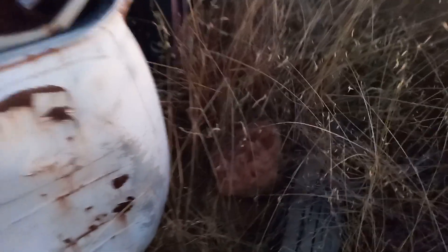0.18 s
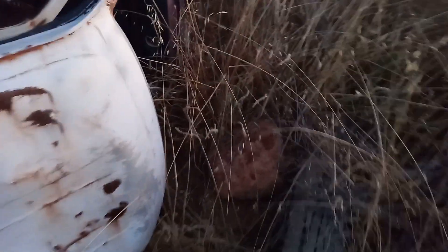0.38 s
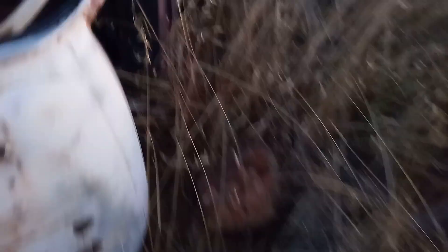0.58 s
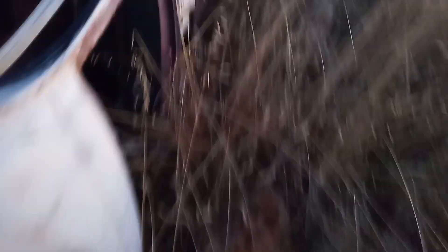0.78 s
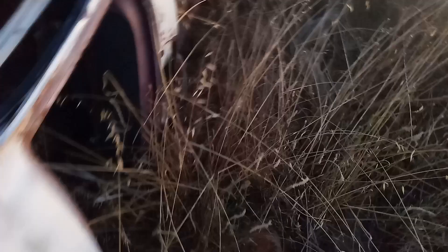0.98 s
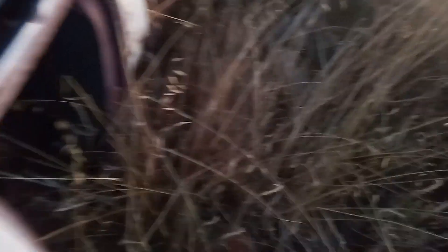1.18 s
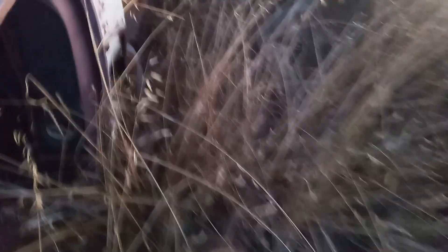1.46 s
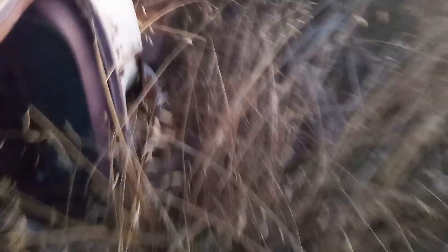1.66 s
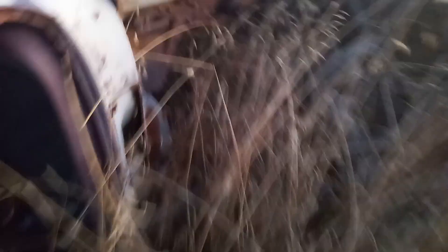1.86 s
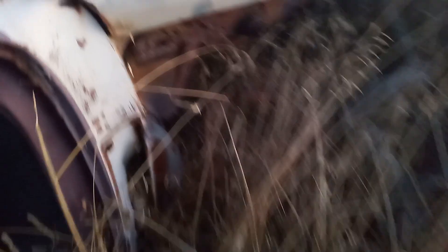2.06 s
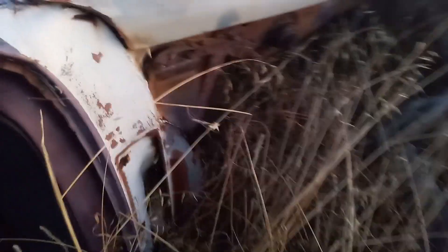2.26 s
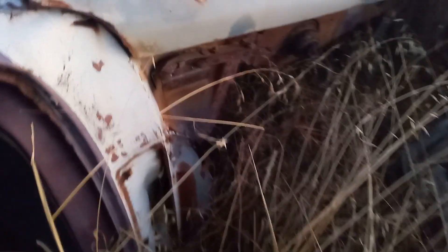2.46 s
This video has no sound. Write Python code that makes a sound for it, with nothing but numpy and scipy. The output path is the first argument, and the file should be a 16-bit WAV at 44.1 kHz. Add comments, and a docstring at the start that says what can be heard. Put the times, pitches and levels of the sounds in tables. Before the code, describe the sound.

Dry grass crackles close up, outdoors and without echo. A faint rustle with tiny ticks opens; a dull, woody crunch lands at 0.22 seconds, then the loudest, sharp brittle crackle at 0.45 with a short creak. It quiets to faint brushing, with light flicks around 1.0. A small crackle with a soft thud comes at 1.6, brighter swishes and flicks at 2.05 and 2.25, then a thin fading hiss.

```python
"""A faint dry rustle opens, then two crunches underfoot: someone pushes slowly through tall dry grass.
The second crunch is a sharp crackle of breaking stalks, a lighter one comes later, and dull thuds sit under all three.
Snaps, flicks, knocks and thuds are short coloured noise bursts; creaks are rough tones with a rising pitch.
Brushing, scraping and rubbing are clumped ticks over noise; a high seed-head hiss grows toward the end.
A low rumble swells underneath, and the highest treble dulls late on."""
import sys
import numpy as np
from scipy import signal
from scipy.fft import rfft, irfft
from scipy.io import wavfile
from scipy.ndimage import uniform_filter1d

SR = 44100
rng = np.random.default_rng(int(sys.argv[2]) if len(sys.argv) > 2 else 0)


def log_audio(samples):
    """Write samples as a 16-bit WAV file to the path given in sys.argv[1]."""
    # one column per channel
    frames = np.atleast_2d(samples).T
    # limit to full scale, then quantise
    limited = np.clip(frames, -1, 1)
    pcm = np.round(limited * 32767).astype(np.int16)
    wavfile.write(sys.argv[1], SR, pcm)


N = 114660
T = np.arange(N) / SR

# low rumble of the walker's movement: (time [s], level [dB])
RUMBLE_LEVEL = [(0, -87), (.25, -78.5), (.6, -72), (.72, -83.5), (1.15, -82.5), (1.3, -75.5), (1.52, -84),
                (1.57, -68.5), (1.7, -79), (1.775, -69.5), (1.815, -59), (1.85, -82.5), (2.6, -82.5)]
# its colour: (frequency [Hz], gain [dB])
RUMBLE_COLOUR = [(20, -42), (45, -27), (80, 7), (130, 0.5), (220, 0), (500, -33), (2000, -44.5)]

# dull rubbing of the flattened grass: (time [s], level [dB])
RUB_LEVEL = [(0, -82), (.68, -86.5), (.83, -67.5), (1.04, -92), (1.26, -73), (1.39, -87), (1.62, -64),
             (1.7, -85), (1.76, -79), (1.85, -66.5), (1.9, -81.5), (2.6, -86)]
# its colour: (frequency [Hz], gain [dB])
RUB_COLOUR = [(60, -33.5), (170, -11.5), (320, -5.5), (680, -9), (850, -12.5), (2000, -32.5), (8000, -62)]
RUB_TICKS_PER_S, RUB_SPREAD_DB, RUB_HISS = 330, 3.5, 0.65

# thicker stems scraping and bending low down: (time [s], level [dB])
SCRAPE_LEVEL = [(0, -59.5), (.04, -60.5), (.16, -70.5), (.21, -67), (.245, -40), (.28, -65), (.44, -66),
                (.475, -41), (.5, -53), (.54, -70), (.68, -78.5), (.81, -67), (.92, -78.5), (1.04, -61.5),
                (1.19, -76.5), (1.26, -65.5), (1.37, -70), (1.52, -67.5), (1.61, -53.5), (1.68, -80),
                (1.755, -57.5), (1.8, -74), (1.85, -62), (1.885, -77), (1.92, -84), (2.08, -61),
                (2.19, -73.5), (2.6, -87)]
# colour of thick stems, scraped or knocked: (frequency [Hz], gain [dB])
STEM_COLOUR = [(60, -22.5), (180, -15), (310, -2.5), (620, -8), (800, -2), (1200, -1), (2600, 1),
               (4200, -4.5), (8000, -12), (16000, -34)]
SCRAPE_TICKS_PER_S, SCRAPE_SPREAD_DB, SCRAPE_HISS = 900, 3, 0.57

# brushing of the fine blades and seed heads: (time [s], level [dB])
BRUSH_LEVEL = [(0, -59), (.05, -49.5), (.08, -57.5), (.16, -51.5), (.2, -62), (.27, -58.5), (.32, -60.5),
               (.36, -59), (.52, -63), (.68, -68.5), (.83, -65), (.941, -74.5), (.949, -55.5),
               (1.12, -52.5), (1.215, -62.5), (1.36, -62.5), (1.43, -55), (1.52, -62), (1.6, -60.5),
               (1.86, -57.5), (1.91, -52.5), (1.98, -51), (2.075, -45.5), (2.16, -57.5), (2.232, -57.5),
               (2.255, -45.5), (2.31, -59), (2.42, -71.5), (2.6, -75)]
# its colour: (frequency [Hz], gain [dB])
BLADE_COLOUR = [(200, -21.5), (900, -30), (2000, -11.5), (3500, -6.5), (5000, -2.5), (6600, 1), (9200, -1),
                (10200, -12.5), (12000, -18.5), (13800, -25), (15000, -1.5), (16000, -12.5)]
BRUSH_TICKS_PER_S, BRUSH_SPREAD_DB, BRUSH_HISS = 3000, 2.5, 0.52

# thin hiss of seed heads sliding past at the end: (time [s], level [dB])
SEED_LEVEL = [(1.7, -100), (2.1, -60), (2.41, -66), (2.5, -61.5), (2.6, -71.5)]
# its colour: (frequency [Hz], gain [dB])
SEED_COLOUR = [(3500, -28), (5600, -13.5), (7100, -4), (10000, -36)]

# clumping and patchy colour shared by the rustling layers; depths are rms
CLUMP_S, CLUMP_DB = 0.013, 2.5
PATCH_HZ, PATCH_S, PATCH_DB = 260, .03, 3

# bending stems: (time [s], rms level before the swell [dB], length [s], mid-creak pitch [Hz])
CREAKS = [(.447, -39.5, 0.044, 2700), (.443, -40, 0.045, 3620), (1.214, -72.5, 0.089, 329.7),
          (1.268, -64.5, 0.029, 4200), (1.332, -71, 0.034, 472), (1.478, -68, 0.042, 348)]
CREAK_RISE_HZ_PER_S, CREAK_JITTER_SHARE = 850, 0.053
CREAK_SLIP_S, CREAK_ROUGH_DB = 0.0017, 4

# thicker stems knocking low down: (time [s], onset level [dB])
KNOCKS = [(0.786, -69), (1.038, -58), (1.438, -56), (1.631, -52.5), (1.741, -57), (1.761, -54.5),
          (1.848, -59), (2.341, -55)]
KNOCK_DECAY_S, KNOCK_DB_PER_OCTAVE = 0.0045, -3

# seed heads and stalks flicking past: (time [s], onset level [dB])
FLICKS = [(0.107, -46.5), (.342, -50), (0.832, -51.5), (0.868, -53), (.987, -45), (1.008, -47.5),
          (1.04, -47.5), (1.089, -49), (1.127, -51), (1.339, -50), (1.777, -55), (1.903, -54), (1.942, -51),
          (1.994, -55), (2.039, -44.5), (2.058, -38.5), (2.122, -47.5), (2.243, -46), (2.332, -50.5)]
# their colour: (frequency [Hz], gain [dB])
FLICK_COLOUR = [(200, -60), (900, -14.5), (2000, -2.5), (3500, 6.5), (6700, 4.5), (9000, 3), (12000, -14),
                (15500, -11)]
FLICK_DECAY_S = 0.0041

# weight on the matted ground: (time [s], level before THUD_GAIN [dB], decay [s], centre [Hz])
THUDS = [(0.191, -59.5, 0.059, 360), (0.2219, -34, 0.0031, 340), (0.245, -49.5, 0.008, 320),
         (.256, -52.5, 0.0075, 480), (0.46, -41, 0.0097, 680), (0.472, -44, 0.01, 234.7),
         (0.513, -55, 0.0071, 262), (.585, -57.5, 0.0033, 207), (1.596, -56, 0.011, 324)]
# resonances of the matted ground: (frequency [Hz], width [Hz], relative peak [dB])
GROUND_RESONANCES = [(247.7, 76, -2), (317.3, 89, 2), (533, 220, -3.5), (650, 99, 1.5)]
THUD_RISE_S, THUD_OCTAVES, THUD_GAIN = 0.0023, 0.98, 2

# stalks breaking: (time [s], level before SNAP_TRIM_DB [dB], centre [Hz], time for fibres to give way [s])
SNAPS = [(0.0243, -43.5, 4970, 0.00062), (0.039, -42, 3900, 0.00041), (.189, -46.5, 1870, 0.0012),
         (0.2143, -47.5, 2840, 0.002), (0.2192, -38.5, 2600, .001), (0.2238, -29, 2120, 0.00092),
         (0.2283, -33, 2300, 0.00044), (0.2385, -36, 2700, .0003), (0.2459, -33, 2200, 0.0007),
         (.2470, -31, 1187, 0.00054), (0.3754, -50.5, 3340, 0.0008), (0.41, -49, 4110, 0.0003),
         (.425, -49, 4530, 0.00037), (0.4332, -37.5, 4730, 0.0002), (.4439, -32.5, 3820, 0.00033),
         (0.4463, -21.5, 3860, 0.00045), (0.4555, -28, 3580, 0.00012), (0.46, -35.5, 8630, 0.00034),
         (0.4617, -27.5, 5930, 0.000082), (0.4656, -35.5, 5500, 0.00042), (0.469, -36.5, 2950, 0.00074),
         (0.472, -36.5, 3300, 0.00025), (0.4782, -39, 2390, .0012), (0.482, -37.5, 3280, 0.00077),
         (0.493, -54.5, 6500, 0.00015), (0.5117, -43.5, 3440, 0.00085), (0.9477, -46, 7200, 0.000065),
         (1.5919, -39, 5340, 0.00011), (1.5944, -41, 2380, 0.00025), (1.5958, -41, 2070, 0.0009),
         (1.610, -54, 4160, 0.00069), (1.6217, -48.5, 3940, 0.00036)]
# base colour of a breaking stalk: (frequency [Hz], gain [dB])
STALK_COLOUR = [(60, -44.5), (250, -11), (600, 4), (820, -11), (1000, -0.5), (1400, -1.5), (3600, -0.5),
                (5200, -3), (6700, -1.5), (9000, -5), (12000, -22.5), (15500, -11.5)]
# ringing of the hollow stalks: (frequency [Hz], width [Hz], lift [dB])
STALK_RINGS = [(1026, 190, 4.5), (1408, 150, 9), (2295, 240, 3.5), (2780, 143, -1), (3660, 294, 2.5),
               (6180, 100, 3), (6640, 490, 5), (9070, 270, 8.5)]
SNAP_TRIM_DB, SNAP_SPAN_S = -1, .005  # level is mean power over the span
SNAP_OCTAVES, SNAP_SKIRT_DB = 0.75, -16
SNAP_RING_DB, SNAP_RING_OCTAVES = 4, 0.16
SNAP_DECAY_S, DECAY_PER_GIVE = .0012, 0.53  # slower breaks also die away slower
SPLINTER_DB, SPLINTER_DECAY_S = -18, 0.0067
SPLINTER_CLUMP_S, SPLINTER_CLUMP_DB = 0.00086, 5

# edge above which the treble is dulled: (time [s], edge [Hz])
TREBLE_EDGE = [(0, 11500), (1.6, 10200), (1.9, 8110), (2.6, 8310)]
# no dulling with the edge at OPEN_HZ, DULL_DB with it at SHUT_HZ
DULL_DB, DULL_WIDTH_HZ, OPEN_HZ, SHUT_HZ = -17.5, 440, 10600, 8170
CUTOFF_HZ = 15800


def amp(db):
    """Decibels to gain."""
    return 10 ** (np.asarray(db) / 20)


def unit(x):
    """Scales to an rms of one."""
    return x / np.sqrt(np.mean(x ** 2) + 1e-20)


def curve(points, t=T):
    """Joins points in time by straight lines."""
    return np.interp(t, *np.transpose(points))


def spectrum(points, hz):
    """Reads a colour in dB on a log-frequency axis."""
    f, db = np.transpose(points)
    return np.interp(np.log(hz + 1), np.log(f), db)


def wander(n, seconds):
    """Smooth random drift of rms one that changes over about this time."""
    width = max(int(seconds * SR), 2)
    smooth = uniform_filter1d(rng.standard_normal(n), width)
    return unit(uniform_filter1d(smooth, width))


def add(mix, s, sound):
    """Mixes a sound in at a time."""
    part = mix[round(s * SR):][:len(sound)]
    part += sound[:len(part)]


def colour(x, db_at, size=2048):
    """Causal minimum-phase filter of unit energy, shaped by db_at(Hz)."""
    log_gain = np.log(amp(db_at(abs(np.fft.fftfreq(size, 1 / SR)))))
    taps = np.fft.ifft(np.exp(np.conj(signal.hilbert(log_gain)))).real
    return signal.fftconvolve(x, taps / np.linalg.norm(taps))[:len(x)]


def burst(envelope, db_at, count=2):
    """A short shower of fibre fractures: noise driving all pitches evenly, with its envelope's energy."""
    drive = envelope * rng.standard_normal(len(envelope))
    for _ in range(count):
        # flatten the spectrum, then even out the loudness and reapply the envelope
        flat = irfft(np.exp(1j * np.angle(rfft(drive))), len(drive))
        loudness = np.sqrt(abs(uniform_filter1d(flat ** 2, size=48)) + 1e-12)
        drive = envelope * flat / loudness
    x = colour(drive, db_at)
    return x * np.linalg.norm(envelope) / np.linalg.norm(x)


def patchy(x, size=512):
    """Different stalks touch from moment to moment, so the colour shifts in small patches."""
    hz, t, z = signal.stft(x, SR, nperseg=size)
    field = rng.standard_normal(z.shape[::-1]).T
    field = uniform_filter1d(field, max(int(PATCH_HZ / hz[1] + .5), 1), axis=0)
    field = uniform_filter1d(field, max(int(PATCH_S / t[1] + .5), 1), axis=1)
    return unit(signal.istft(z * amp(PATCH_DB * unit(field)), SR, nperseg=size)[1][:N])


def rustle(level, tone, rate, spread_db, hiss):
    """Clumps of tiny stick-slip ticks of uneven size over the blur of many fainter ones."""
    sizes = amp(spread_db * np.minimum(rng.exponential(1, N), 4))
    happens = rng.random(N) < rate / SR
    ticks = sizes * rng.choice([-1., 1.], N) * happens
    blur = hiss * rng.standard_normal(N)
    clumps = amp(CLUMP_DB * wander(N, CLUMP_S))
    drive = patchy((unit(ticks) + blur) * clumps)
    return colour(drive * amp(curve(level)), lambda f: spectrum(tone, f))


def rumble():
    """Soft low noise that swells as the walker shifts weight."""
    noise = rng.standard_normal(N)
    low = colour(noise, lambda f: spectrum(RUMBLE_COLOUR, f), size=8192)
    return unit(low) * amp(curve(RUMBLE_LEVEL))


def rubbing():
    """Flattened grass rubs in sparse, dull stick-slip ticks."""
    return rustle(RUB_LEVEL, RUB_COLOUR, RUB_TICKS_PER_S, RUB_SPREAD_DB, RUB_HISS)


def scraping():
    """Thicker stems scrape and bend in coarse stick-slip ticks."""
    return rustle(SCRAPE_LEVEL, STEM_COLOUR, SCRAPE_TICKS_PER_S, SCRAPE_SPREAD_DB, SCRAPE_HISS)


def brushing():
    """Fine blades and seed heads brush past in dense, bright ticks."""
    return rustle(BRUSH_LEVEL, BLADE_COLOUR, BRUSH_TICKS_PER_S, BRUSH_SPREAD_DB, BRUSH_HISS)


def seed_hiss():
    """Seed heads slide past with the dense ticks of brushing, in a thin high colour."""
    return rustle(SEED_LEVEL, SEED_COLOUR, BRUSH_TICKS_PER_S, BRUSH_SPREAD_DB, BRUSH_HISS)


def creaks():
    """A bending stem sticks and slips in a rough tone that rises as it tightens."""
    out, t = np.zeros(N), T[:SR // 10]
    for s, db, length, hz in CREAKS:
        jitter = 1 + CREAK_JITTER_SHARE * wander(len(t), CREAK_SLIP_S)
        pitch = hz * jitter + CREAK_RISE_HZ_PER_S * (t - length / 2)
        roughness = amp(CREAK_ROUGH_DB * wander(len(t), CREAK_SLIP_S))
        tone = np.sin(2 * np.pi * np.cumsum(pitch) / SR) * roughness
        swell = np.sin(np.pi * np.minimum(t / length, 1))
        add(out, s, amp(db) * swell * unit(tone))
    return out


def knocks():
    """Thicker stems knock together low down, each a darkened, decaying burst."""
    def tone(f):
        return spectrum(STEM_COLOUR, f) + KNOCK_DB_PER_OCTAVE * np.log2(f + 1)

    out, t = np.zeros(N), T[:SR // 20]
    for s, db in KNOCKS:
        add(out, s, amp(db) * burst(np.exp(-t / KNOCK_DECAY_S), tone))
    return out


def flicks():
    """Single stalks slip free and tap their neighbours, each a bright, decaying burst."""
    out, t = np.zeros(N), T[:SR // 20]
    for s, db in FLICKS:
        tap = burst(np.exp(-t / FLICK_DECAY_S), lambda f: spectrum(FLICK_COLOUR, f))
        add(out, s, amp(db) * tap)
    return out


def thuds():
    """The foot's weight shakes the damped low resonances of the grass mat."""
    out, t = np.zeros(N), T[:SR // 6]
    for s, db, decay, centre in THUDS:
        def tone(f):
            mat = sum(amp(peak) ** 2 / (1 + (2 * (f - hz) / width) ** 2) ** 2
                      for hz, width, peak in GROUND_RESONANCES)
            focus = np.exp(-(np.log2((f + 1) / centre) / THUD_OCTAVES) ** 2)
            return 10 * np.log10(mat * focus + 1e-7)

        envelope = (1 - np.exp(-t / THUD_RISE_S)) * np.exp(-t / decay)
        add(out, s, THUD_GAIN * amp(db) * burst(envelope, tone))
    return out


def snaps():
    """Each stalk gives way with a crack, rings briefly at its own pitch and trails off in splinters."""
    out, t = np.zeros(N), T[:SR // 10]
    for s, db, hz, give in SNAPS:
        def tone(f):
            octaves = np.log2((f + 1) / hz)
            bump = np.exp(-.5 * (octaves / SNAP_OCTAVES) ** 2)
            focus = 20 * np.log10(bump + amp(SNAP_SKIRT_DB))
            own_ring = SNAP_RING_DB / (1 + (octaves / SNAP_RING_OCTAVES) ** 2)
            hollow_rings = sum(lift / (1 + (2 * (f - at) / width) ** 2)
                               for at, width, lift in STALK_RINGS)
            return spectrum(STALK_COLOUR, f) + own_ring + hollow_rings + focus

        clumps = SPLINTER_CLUMP_DB * wander(len(t), SPLINTER_CLUMP_S)
        splinters = amp(SPLINTER_DB + clumps) * np.exp(-t / SPLINTER_DECAY_S)
        dying = np.exp(-t / (SNAP_DECAY_S + DECAY_PER_GIVE * give)) + splinters
        giving_way = 1 - np.exp(-(t / give) ** 2)
        crack = burst(giving_way * dying, tone)
        crack *= np.sqrt(SNAP_SPAN_S * SR) / np.linalg.norm(crack)
        add(out, s, amp(db + SNAP_TRIM_DB) * crack)
    return out


def scene():
    """Sums all sources dry into one channel, from the background to the breaking stalks."""
    background = rumble() + rubbing() + scraping()
    grass = brushing() + seed_hiss() + creaks()
    contacts = knocks() + flicks()
    footfalls = thuds() + snaps()
    return (background + grass + contacts + footfalls)[None]


def record(dry):
    """The highest treble dulls toward the end; then a low-pass sets the band limit."""
    hz, t, z = signal.stft(dry, SR, nperseg=256)
    edge = curve(TREBLE_EDGE, t)
    depth = np.clip((OPEN_HZ - edge) / (OPEN_HZ - SHUT_HZ), 0, 2)
    above = .5 + .5 * np.tanh((hz[:, None] - edge) / DULL_WIDTH_HZ)
    dulled = signal.istft(z * amp(DULL_DB * depth * above), SR, nperseg=256)[1][:, :N]
    low_pass = signal.firwin(511, CUTOFF_HZ, window=("kaiser", 9), fs=SR)
    return signal.oaconvolve(dulled, low_pass[None], "same")


dry = scene()
out = record(dry)
log_audio(out)
```